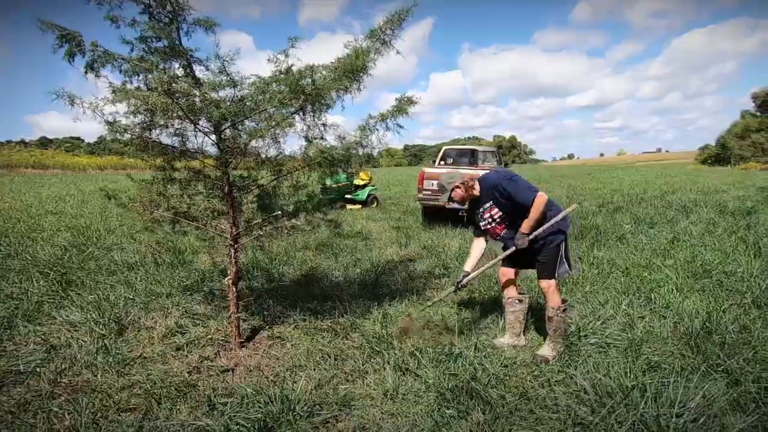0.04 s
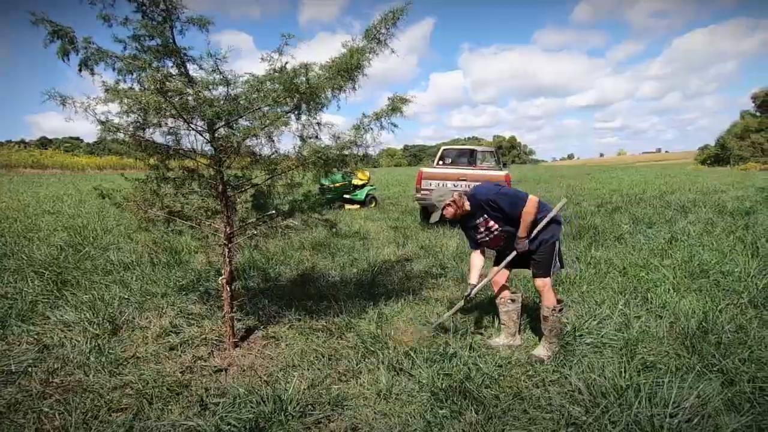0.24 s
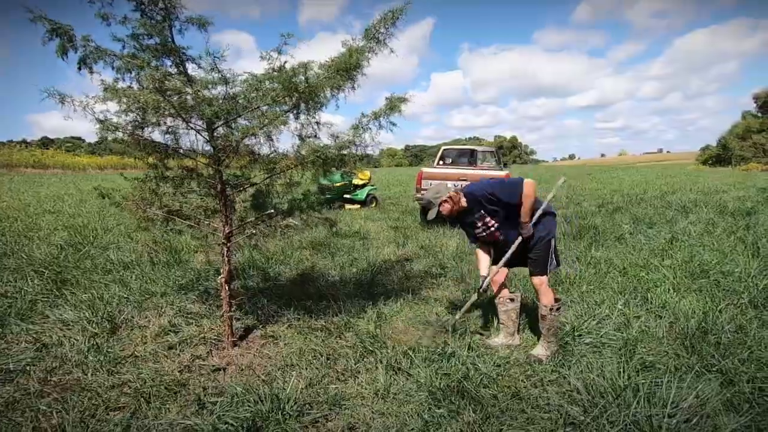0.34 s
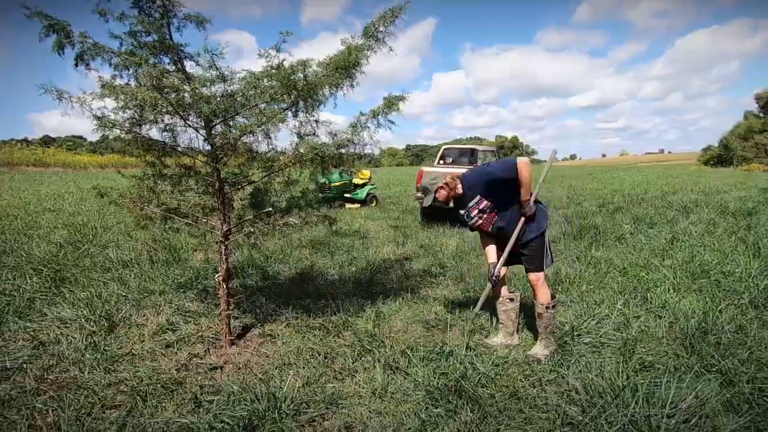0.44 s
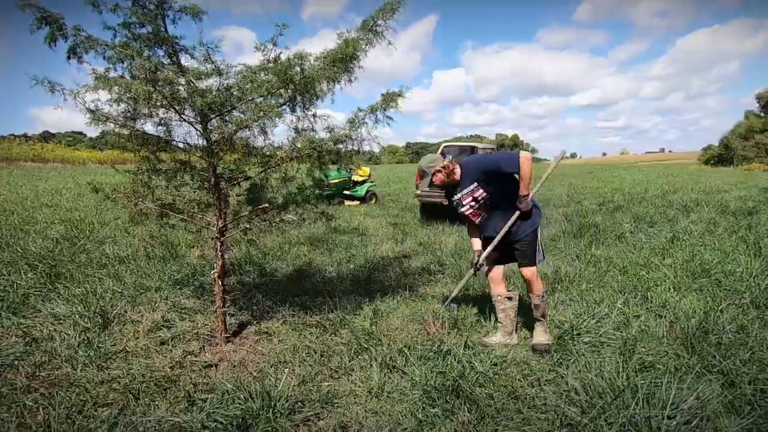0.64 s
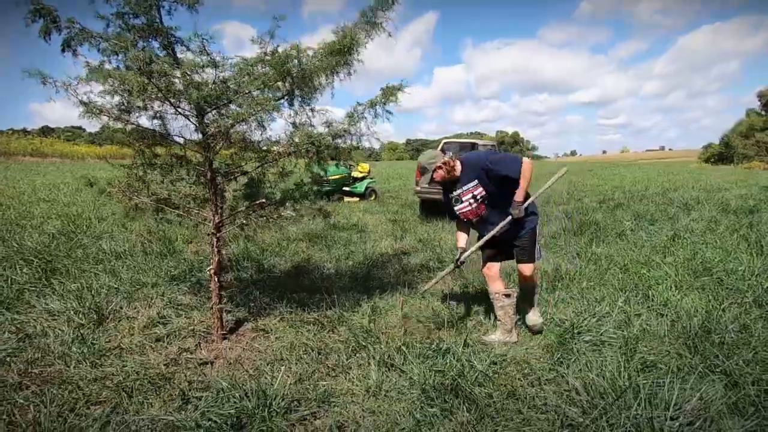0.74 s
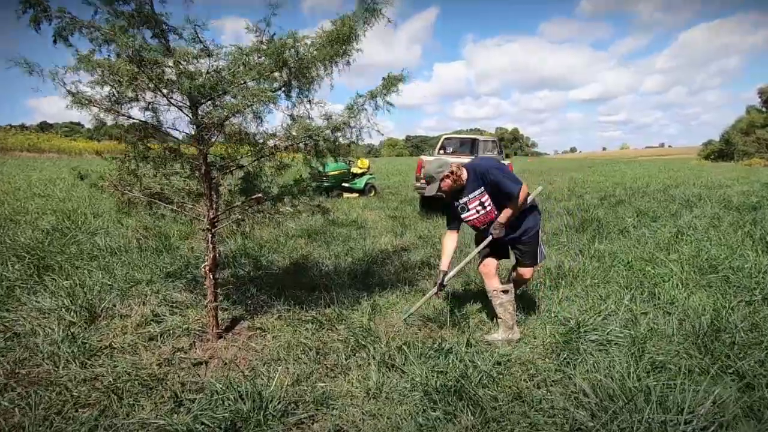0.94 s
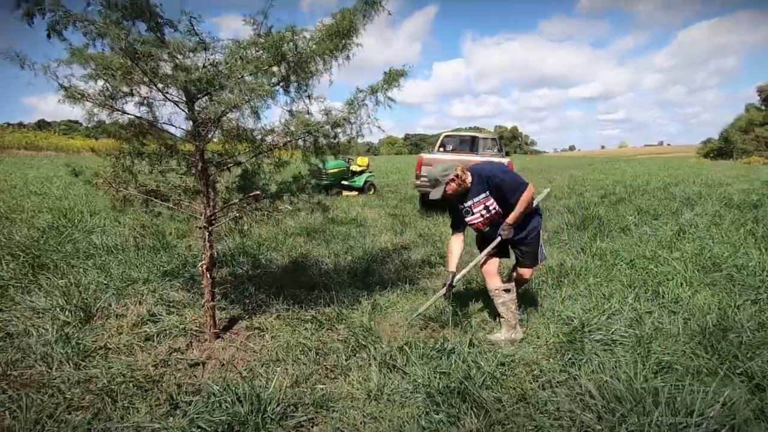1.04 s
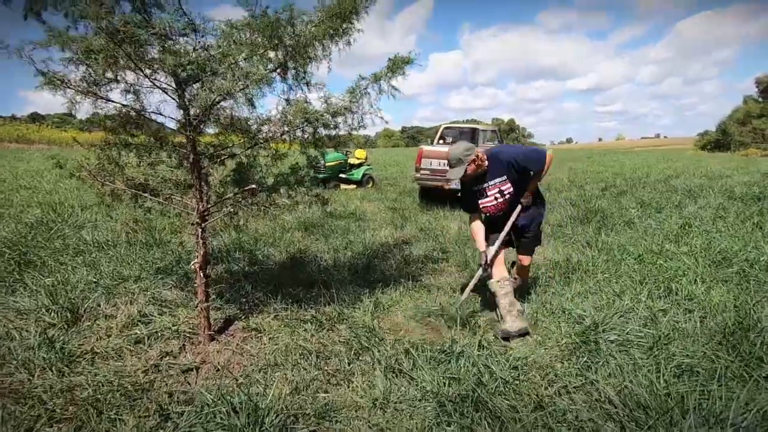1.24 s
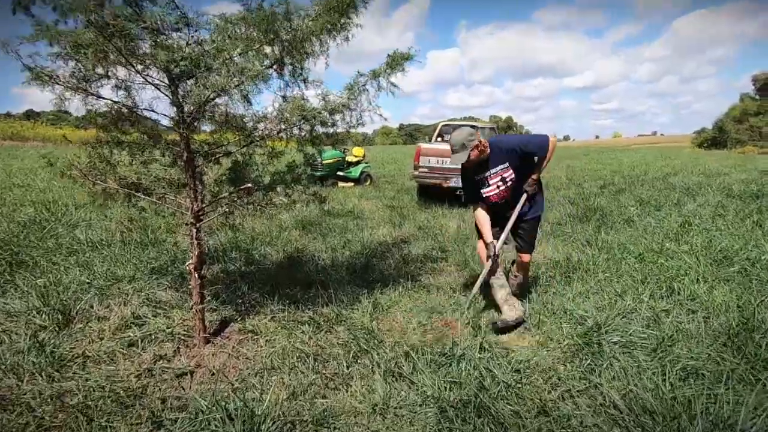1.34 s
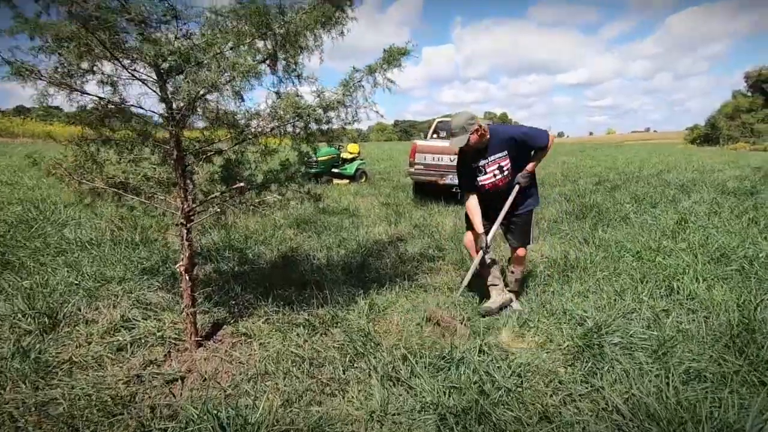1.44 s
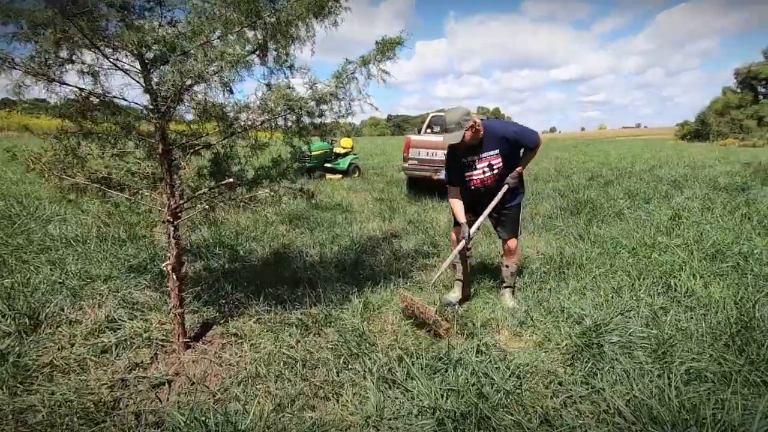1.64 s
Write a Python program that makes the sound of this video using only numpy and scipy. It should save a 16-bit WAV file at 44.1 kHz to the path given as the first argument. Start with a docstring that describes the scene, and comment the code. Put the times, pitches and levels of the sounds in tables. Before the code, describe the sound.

A garden tool scrapes twice through grass and soil while wind buffets the microphone in a field

```python
"""An open field, 1.7 s: meadow hiss and shrill insects (narrow noise, throbbing) run throughout.
Small snaps (noise bursts ringing a tool head) and a soil thud come before the first drag at 0.3 s, made
of breaking stems and friction noise. From then to 1.2 s shaped noise and pressure swells buffet the
microphone, mostly its right port, and clip it; steel (decaying sines) ticks a pebble at 0.73 s. The
second drag starts at 1.15 s, with more snaps and a thud; a faint far tone swells again near the end."""
import sys
import numpy as np
from scipy import signal
from scipy.fft import rfft, irfft
from scipy.io import wavfile
from scipy.ndimage import uniform_filter1d

SR = 44100
rng = np.random.default_rng(int(sys.argv[2]) if len(sys.argv) > 2 else 0)


def wav_out(sig):
    """Save sig, one row per channel (or a flat mono array), as 16-bit PCM at SR to the path in sys.argv[1]."""
    wavfile.write(sys.argv[1], SR, np.round(np.clip(np.atleast_2d(sig).T, -1, 1) * 32767).astype(np.int16))


N = 74970  # length in samples


def from_db(db):
    """Decibels to gain."""
    return 10 ** (np.asarray(db) / 20)


def rms_one(x):
    """Scale to unit RMS level."""
    return x / np.sqrt(np.mean(x ** 2) + 1e-20)


def seconds():
    """The time axis in seconds."""
    return np.arange(N) / SR


def bin_hz():
    """The frequency axis of the spectrum in Hz."""
    return np.arange(N // 2 + 1) * SR / N


def level(curve):
    """Gain over time from (t/s, level/dB) points."""
    times, db = np.transpose(curve)
    return from_db(np.interp(seconds(), times, db))


def panned(db):
    """Left and right gains of unit mean power; positive dB leans left."""
    return rms_one(from_db([[db / 2], [-db / 2]]))


def bump(s, width):
    """A Gaussian swell around a moment, both in seconds."""
    return np.exp(-.5 * ((seconds() - s) / width) ** 2)


def white():
    """Two unrelated white noises."""
    return rng.standard_normal((2, N))


def coloured(x, spectrum):
    """Shape a sound by (f/Hz, level/dB) points; unit level."""
    hz, db = np.transpose(spectrum)
    f = np.maximum(bin_hz(), SR / N / (SR / N))  # keeps the logarithm off zero
    gain = from_db(np.interp(np.log(f), np.log(hz), db))
    return rms_one(irfft(rfft(x) * gain, N))


def filtered(x, hz, kind):
    """Butterworth filter of design order 2."""
    edges = np.clip(hz, 10, .45 * SR)
    sections = signal.butter(2, edges, kind, fs=SR, output="sos")
    return signal.sosfilt(sections, x + 1e-18)


def narrow(hz, width_hz):
    """Two unrelated noises in the same narrow band."""
    return rms_one(filtered(white(), [hz - width_hz / 2, hz + width_hz / 2], "band"))


def evened(x, size):
    """Even out the swings of a noise that last longer than size samples."""
    power = uniform_filter1d(uniform_filter1d(x ** 2, size=size), size=size)
    return x / np.sqrt(power + 1e-12)


def stereo(pair, likeness):
    """Two unrelated sounds become left and right: 1 is alike, 0 unrelated, -1 opposite."""
    c = np.clip(likeness, -1, 1)
    shared = np.sqrt(1 + c) * pair[0]
    opposed = np.sqrt(1 - c) * pair[1] * np.array([[1], [-1]])
    return rms_one(shared + opposed)


# spectrum of the meadow hiss: (f/Hz, relative level/dB)
HISS_SPECTRUM = [(100, -15), (200, 24.5), (300, 11.5), (420, 0), (780, 8), (980, 2), (1300, 5), (1900, 3.5),
                 (3400, 3.5), (4600, 1.5), (5500, 0), (6600, 0.5), (8800, -2.5), (10000, 0.5), (11200, -5),
                 (13000, -7), (15500, -23)]
# loudness of the meadow hiss: (t/s, level/dB)
HISS_LEVEL = [(0, -43.5), (.22, -44), (.6, -39.5), (.8, -42.5), (1.1, -40.5), (1.7, -45)]
HISS_PAN_DB, HISS_LIKENESS = -1, 0.1
# insect choruses: (f/Hz, width/Hz, level/dB before the throb, pan/dB to the left, pulses per s)
INSECTS = [(4000, 220, -53.5, -5.5, 40), (7100, 630, -50.5, -4, 26), (7960, 750, -48, -4, 17)]
INSECT_THROB = 0.1  # swing of the gain
# swells of the far-off tone: (t/s, level/dB)
FAR_TONE_LEVEL = [(0, -58), (.7, -56.5), (.89, -50), (.96, -54), (1.02, -48), (1.12, -63), (1.53, -52),
                  (1.61, -46.5), (1.7, -53)]
FAR_HZ, FAR_WIDTH_HZ, FAR_LIKENESS = 1304, 180, -0.99


def field():
    """Soft broadband hiss, narrow-band insect choruses with a throbbing gain, and a far-off tone."""
    hiss = coloured(stereo(white(), HISS_LIKENESS), HISS_SPECTRUM)
    out = level(HISS_LEVEL) * hiss * panned(HISS_PAN_DB)
    for hz, width_hz, db, pan, rate in INSECTS:
        phase = rng.random((2, 1))
        throb = 1 + INSECT_THROB * np.sin(2 * np.pi * (rate * seconds() + phase))
        out = out + from_db(db) * throb * narrow(hz, width_hz) * panned(pan)
    far_tone = stereo(narrow(FAR_HZ, FAR_WIDTH_HZ), FAR_LIKENESS)
    return out + level(FAR_TONE_LEVEL) * far_tone


# wind strength at each port, before brightening: (t/s, level/dB)
WIND_LEFT = [(0, -28), (.1, -30), (.16, -25), (.26, -25.5), (.33, -41), (.39, -33.5), (.45, -13.5),
             (.51, -27), (.57, -21), (.63, -21), (.69, -14), (.77, -22), (.93, -20), (1.05, -13),
             (1.17, -19.5), (1.24, -29.5), (1.4, -33), (1.48, -37), (1.7, -44.5)]
WIND_RIGHT = [(0, -24.5), (.08, -40.5), (.14, -17.5), (.2, -28), (.29, -20), (.36, -32), (.45, -20.5),
              (.52, -25), (.58, -22), (.62, -11.5), (.71, -14), (.77, -19), (.84, -11.5), (.89, -18.5),
              (.96, -7.5), (1.05, -4), (1.1, -21.5), (1.19, -20), (1.25, -30), (1.32, -21), (1.41, -17),
              (1.48, -39), (1.58, -29.5), (1.7, -43.5)]
# spectrum of the rumble, before brightening: (f/Hz, relative level/dB)
RUMBLE_SPECTRUM = [(12, -32), (25, 2), (42, 5), (90, -2.5), (145, -7.5), (200, -20), (280, -34.5),
                   (450, -50), (1000, -73), (3000, -89)]
# above this pitch the rumble grows faster with wind strength
GUST_TOP_HZ, GUST_TOP_DB, GUST_TOP_GROWTH = 118, 3.5, 0.27


def gusts():
    """Turbulence, separate at each port and brighter as the wind gets stronger."""
    strength = np.array([level(WIND_LEFT), level(WIND_RIGHT)])
    air = evened(coloured(white(), RUMBLE_SPECTRUM), size=1200)
    # filtering both ways leaves the deep part in step with the air, so the rest can be subtracted out
    deep = filtered(air, GUST_TOP_HZ, "low")
    deep = filtered(deep[:, ::-1], GUST_TOP_HZ, "low")[:, ::-1]
    top_gain = from_db(GUST_TOP_DB) * strength ** GUST_TOP_GROWTH
    return strength * (deep + (air - deep) * top_gain)


# eddies thump on a port: (t/s, push level/dB before suction and high-pass, width/ms, pan/dB to the left)
BUFFETS = [(0.304, -1, 3.6, -22), (0.432, -3, 3.5, 22), (0.455, -10.5, 1.58, -23), (.601, 5, 2.28, -42),
           (.654, 6.5, 2.24, -47), (.668, 6.5, 1.47, -39), (0.702, 7, 2.74, -37), (0.731, 0.5, 1.96, 14),
           (.910, 1, 1.55, -30), (0.967, 1, 1.84, -17), (1.002, 6.5, 2.08, -36), (1.019, 2.5, 1.32, -29),
           (1.038, 5, 1.7, -36), (1.067, 5, 2.3, -31), (1.137, 2.5, 1.74, 47), (1.142, 6, 1.83, -54),
           (1.198, -2.5, 2.2, -27)]
SUCTION_SHARE, SUCTION_WIDTHS = 0.35, 3.05  # suction around a push: relative depth and width
PORT_HIGHPASS_HZ = 15.7


def wind():
    """Lumpy turbulence; each large eddy sweeps it aside, pushes on the ports and sucks."""
    air = gusts()
    pushes = 0
    for s, db, ms, pan in BUFFETS:
        width = ms / 1000
        sides = panned(pan) / np.sqrt(2)
        eddy = bump(s, SUCTION_WIDTHS * width)
        pressure = bump(s, width) - SUCTION_SHARE * eddy
        pushes = pushes + from_db(db) * sides * pressure
        air = air * (1 - sides * eddy)
    return air + filtered(pushes, PORT_HIGHPASS_HZ, "high")


# partials of the touched steel: f/Hz
TICK_HZ = [5900, 6200, 7000]
# decay of each partial: (t60/s, level/dB before the soft onset)
TICK_DECAY = [(0.023, -22.5), (.012, -20), (.012, -32)]
TICK_S, TICK_CONTACT_S, TICK_PAN_DB = .726, .0012, -7


def tick():
    """One light, grazing touch of steel on a pebble: decaying sines behind a soft onset."""
    age = np.maximum(seconds() - TICK_S, 0)
    onset = 1 - np.exp(-(age / TICK_CONTACT_S) ** 2)
    rings = 0
    for hz, (t60, db) in zip(TICK_HZ, TICK_DECAY):
        rings = rings + from_db(db - 60 * age / t60) * np.sin(2 * np.pi * hz * age)
    return onset * rings * panned(TICK_PAN_DB)


# clods of soil give way: (t/s, level/dB, Gaussian width/s)
CLODS = [(0.252, -42.5, 0.011), (1.404, -41.5, 0.041)]
CLOD_HZ, CLOD_WIDTH_HZ, CLOD_PAN_DB = 270, 103, -2


def clods():
    """Low, soft thuds of turf pulled loose: swells of narrow noise."""
    thud = stereo(narrow(CLOD_HZ, CLOD_WIDTH_HZ), 1.0)
    swells = sum(from_db(db) * bump(s, width) for s, db, width in CLODS)
    return thud * swells * panned(CLOD_PAN_DB)


def ring(x, hz, t60):
    """A resonator: a unit click sets a decaying sine of starting height 1 ringing."""
    r = from_db(-60 / (t60 * SR))
    w = 2 * np.pi * hz / SR
    return signal.lfilter([0, np.sin(w)], [1, -2 * r * np.cos(w), r * r], x + 1e-18)


# the blade catches, and stems and roots tear or rub along it:
# (t/s, relative level/dB, build-up/s, decay/s, lowest f/Hz, highest f/Hz, pan/dB to the left)
SNAPS = [(0.088, -29, 0.0021, 0.0047, 1910, 4840, 0), (0.0935, -40, 0.00057, .002, 1940, 4030, -2),
         (.089, -51, 0.004, 0.13, 660, 960, 0), (.109, -42.5, 0.0029, 0.023, 1970, 4620, 0),
         (.245, -41.5, 0.0031, 0.014, 1300, 4600, 3.5), (.342, -39.5, 0.02, .02, 890, 7300, 1),
         (0.457, -28, .001, 0.0041, 1150, 2950, -3), (0.5055, -21.5, 0.0028, 0.0013, 1580, 5050, -3),
         (0.514, -33.5, 0.0017, 0.0013, 2000, 4950, 2), (.525, -41, 0.045, 0.0069, 614, 1000, -5),
         (.727, -32, 0.0017, 0.0036, 2380, 10200, -13), (0.864, -40.5, 0.00065, 0.0029, 497, 2120, -13),
         (1.246, -31.5, 0.0036, 0.0037, 935, 5100, 1), (1.278, -34.5, .002, 0.0044, 1800, 6000, 3),
         (1.381, -30.5, 0.0016, 0.0056, 796, 4660, 0), (1.438, -35, 0.0012, 0.0098, 500, 2950, -5)]
# resonances of the tool head: (f/Hz, t60/s, relative level/dB)
HEAD = [(820, .04, 0), (2560, .035, -3), (3230, .015, -7), (3870, .03, -3), (5430, .03, 2), (7600, .015, 4)]
CRACK_DB, HEAD_DB = -3.5, 4.5  # gains of the direct cracks and of the ringing head


def snaps():
    """Each catch is a burst of fine cracks that also rings the tool head."""
    t = seconds()
    force = 0
    for s, db, build, decay, low_hz, high_hz, pan in SNAPS:
        envelope = np.exp(np.minimum((t - s) / build, (s - t) / decay))
        band = [low_hz, high_hz]
        noise = filtered(filtered(stereo(white(), 0.89), band, "band"), band, "band")
        force = force + from_db(db) * envelope * evened(noise, size=120) * panned(pan)
    head = 0
    for hz, t60, db in HEAD:
        unit_peak = 2 * np.log(1000) / (t60 * SR)  # about unit gain at resonance
        head = head + from_db(db) * ring(force, hz, t60) * unit_peak
    return from_db(CRACK_DB) * force + from_db(HEAD_DB) * head


def pull(start, attack, end, release, first_db, last_db, pan_db):
    """Envelope of a stroke: it bites, builds while pulled, then dies away."""
    t = seconds()
    bite = np.clip((t - start) / attack, 0, 1)
    die_away = np.exp(-2 * np.maximum(t - end, 0) / release)
    build = level([(start + attack, first_db), (end, last_db)])
    return bite * die_away * build * panned(pan_db)


def left_late(x, lag_s):
    """Delay the left side slightly by turning its phases."""
    lags = np.array([[lag_s], [0]])
    return irfft(rfft(x) * np.exp(-2j * np.pi * bin_hz() * lags), N)


# drags through soil, then swishes of the grass blades:
# (start t/s, attack/s, end t/s, release/s, first level/dB, last level/dB, pan/dB to the left)
STROKES = [(0.316, 0.03, .548, 0.066, -44.5, -37, -4), (1.148, 0.03, 1.378, 0.31, -45.5, -37, -1.5)]
SWISHES = [(.31, 0.02, 0.56, 0.017, -45.5, -42, 2.5), (1.17, .07, 1.46, 0.24, -43, -38.5, -2)]
# spectra of the scrape and of the swish: (f/Hz, relative level/dB)
SCRAPE_SPECTRUM = [(150, -5.5), (280, 5), (450, -3), (640, 5.5), (840, 5.5), (1000, -9.5), (1250, 3),
                   (1800, 0.5), (2300, -1.5), (3300, 4.5), (4000, 5), (4500, -3.5), (5000, -6), (5450, -6),
                   (6500, -3.5), (7600, -13), (9000, -13), (15000, -28)]
SWISH_SPECTRUM = [(1500, -3), (4000, -9.5), (5000, -10), (6100, -0.5), (6550, -2.5), (7300, -2),
                  (8800, -5.5), (10100, 0), (11200, -8), (12500, -11.5), (14000, -17), (15500, -32)]
STEMS_PER_S, STEM_SPREAD_DB = 1800, 2.5
CLUMP_DB, CLUMP_HZ = 2.1, 88  # stems break in tufts: swing of their level, and how fast it changes
CRACKLE_SHARE = 0.74  # power share of breaking stems in the scrape; the rest is smooth friction
SCRAPE_LIKENESS, SWISH_LIKENESS = 1, 0.15
SWISH_LAG_S = .00005  # the swish reaches the left port this much later


def scrape():
    """Tufts of stems break under the dragged blade as random clicks; long grass swishes past."""
    size_db = STEM_SPREAD_DB * np.minimum(rng.exponential(1, (2, N)), 4)
    sizes = from_db(size_db) * rng.choice([-1, 1], (2, N))
    clumping = rms_one(filtered(rng.standard_normal(N), CLUMP_HZ, "low"))
    tufts = from_db(CLUMP_DB * clumping)
    breaking = rng.random((2, N)) < STEMS_PER_S / SR
    breaks = rms_one(sizes * tufts * breaking)
    share = np.clip(CRACKLE_SHARE, 0, 1)
    friction = np.sqrt(share) * breaks + np.sqrt(1 - share) * white()
    soil = coloured(stereo(friction, SCRAPE_LIKENESS), SCRAPE_SPECTRUM)
    soil = soil * sum(pull(*row) for row in STROKES)
    grass = coloured(stereo(breaks + 1.53 * white(), SWISH_LIKENESS), SWISH_SPECTRUM)
    grass = grass * sum(pull(*row) for row in SWISHES)
    return soil + left_late(grass, SWISH_LAG_S)


# the two ports hear the field differently: (f/Hz, left minus right level/dB)
PORT_BALANCE = [(300, 2), (850, -4), (1300, -3), (3100, -2.5), (4100, 2.5), (5200, 0.5), (7200, 2),
                (8100, 8.5), (9000, -8), (10000, -1.5), (11500, -5.5), (15000, 1)]


def ports(x):
    """Each port colours the sound in its own way."""
    hz, db = np.transpose(PORT_BALANCE)
    lean = np.interp(bin_hz(), hz, db)
    return irfft(rfft(x) * from_db([lean / 2, -lean / 2]), N)


def scene():
    """Meadow and tool reach the ports; wind acts on them directly."""
    return ports(field() + tick() + clods() + snaps() + scrape()) + wind()


OVERLOAD = 1.0  # clipping amplitude
CUTOFF_HZ = 15600


def record(dry):
    """The strongest gusts clip; a steep low-pass then cuts the top."""
    clipped = np.clip(dry, -OVERLOAD, OVERLOAD)
    low_pass = signal.ellip(12, .1, 80, CUTOFF_HZ, fs=SR, output="sos")
    return signal.sosfilt(low_pass, clipped)


dry = scene()
out = record(dry)
wav_out(out)
```